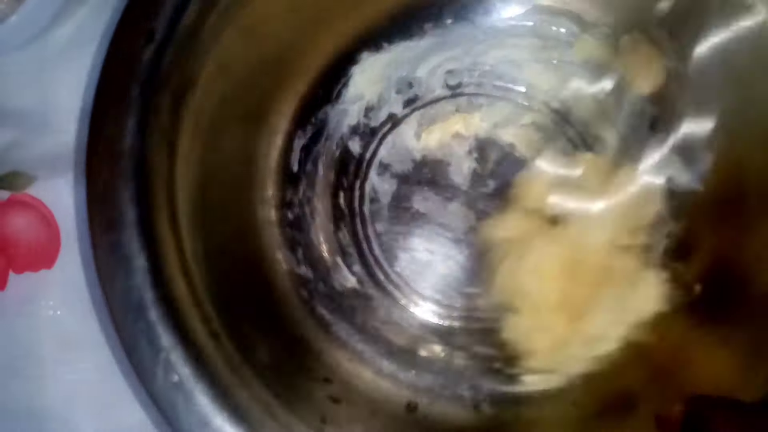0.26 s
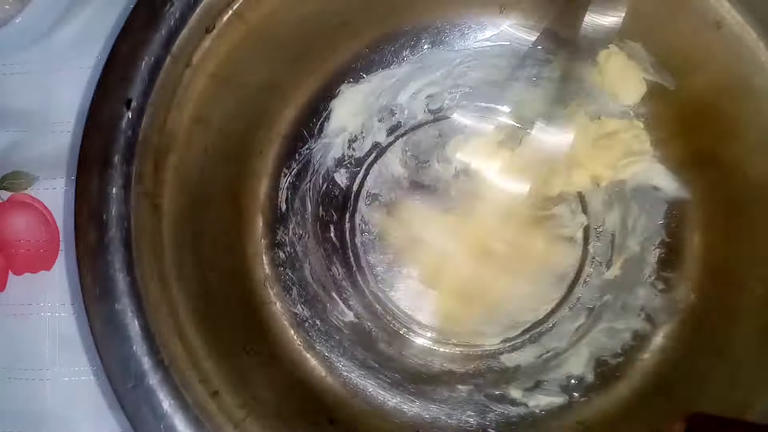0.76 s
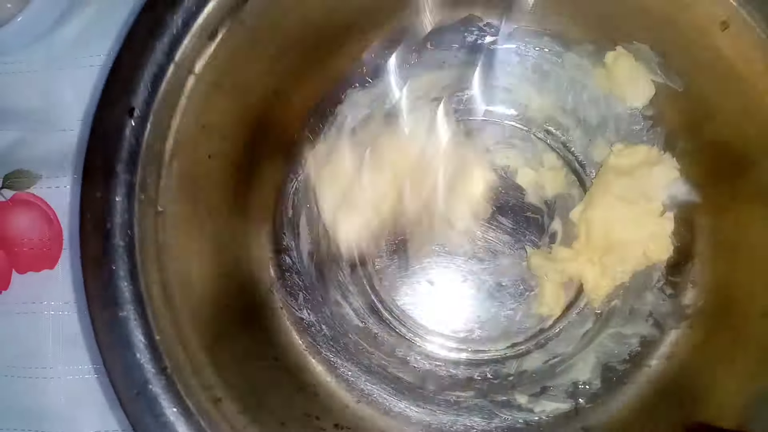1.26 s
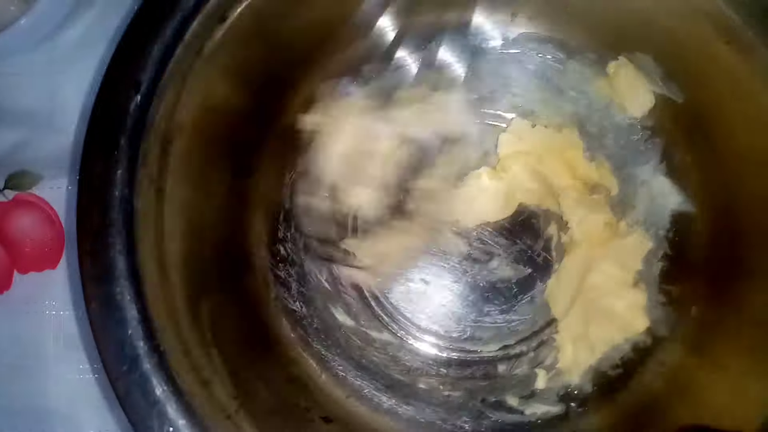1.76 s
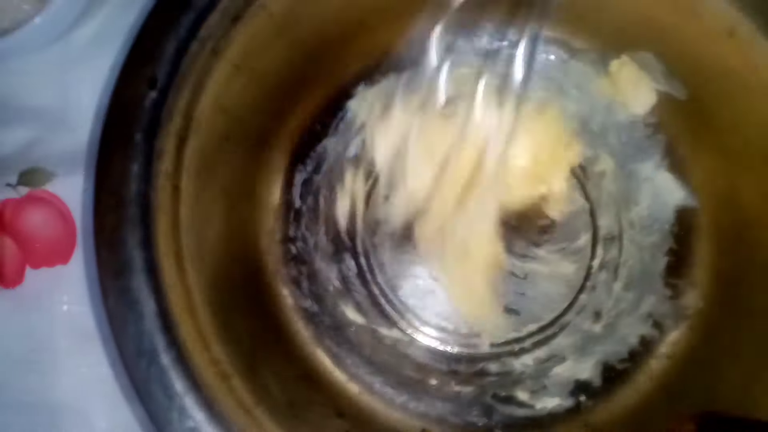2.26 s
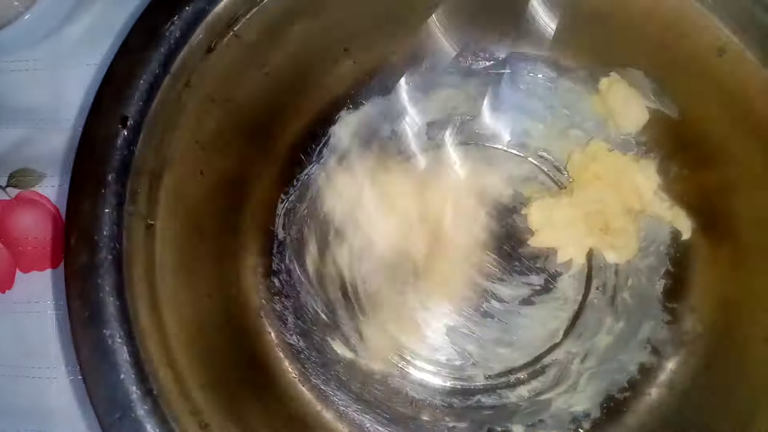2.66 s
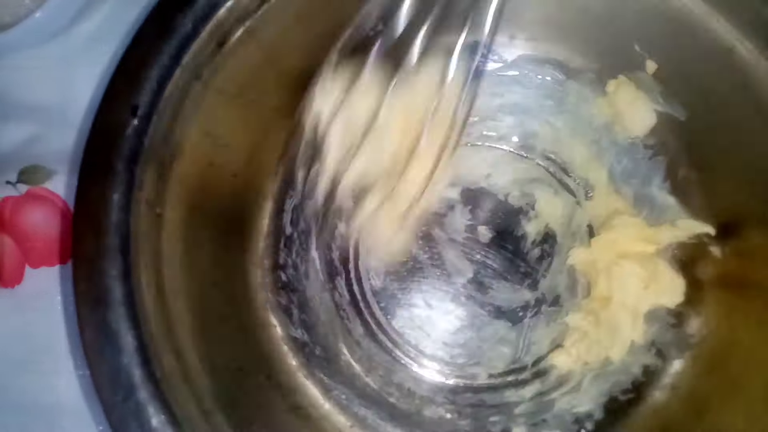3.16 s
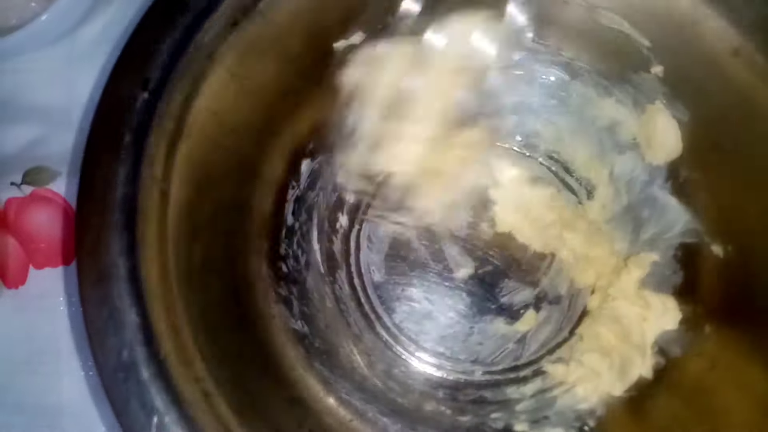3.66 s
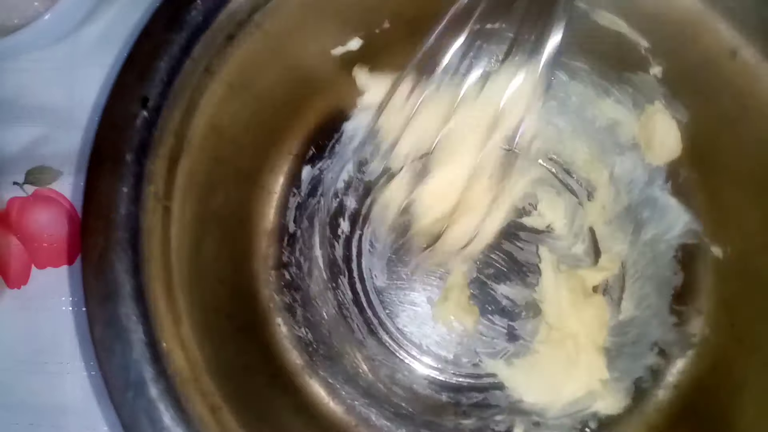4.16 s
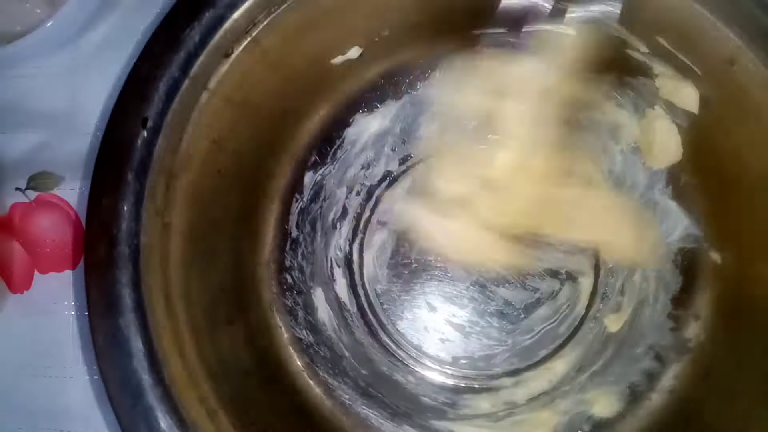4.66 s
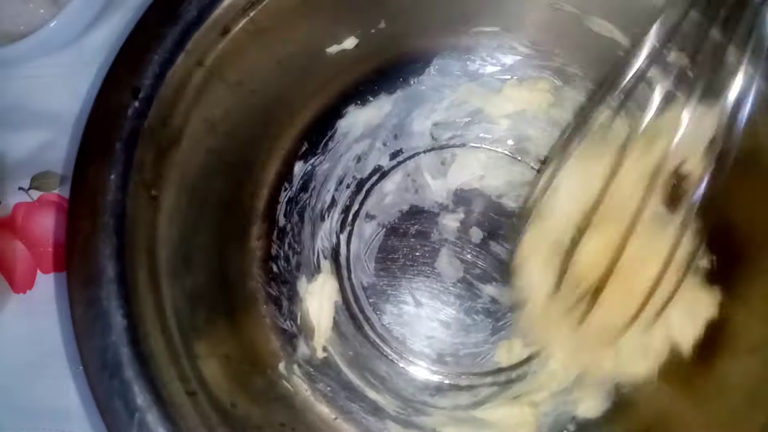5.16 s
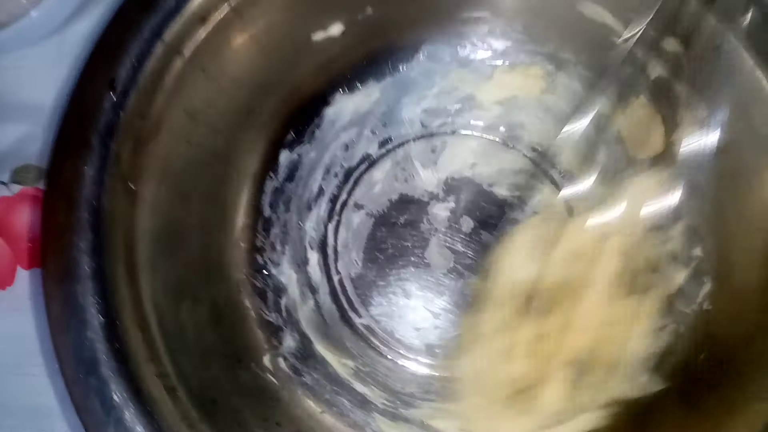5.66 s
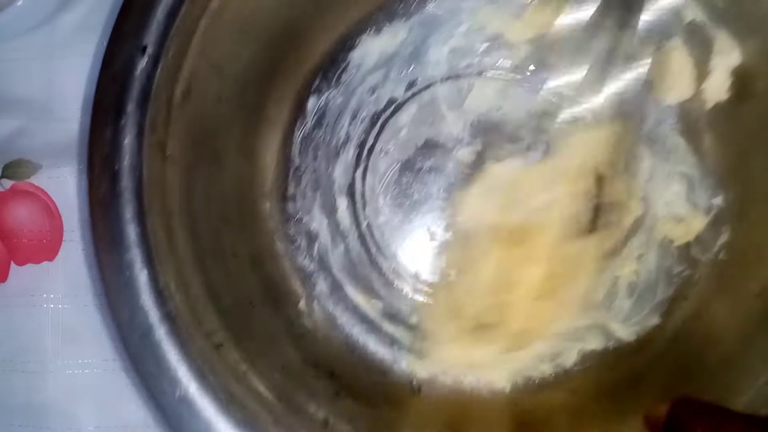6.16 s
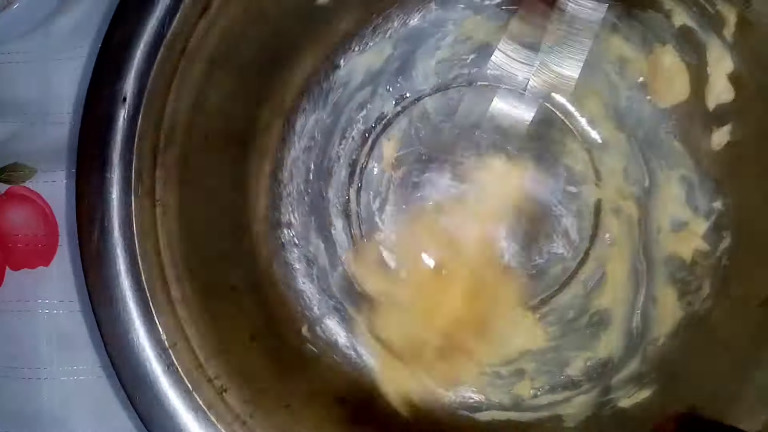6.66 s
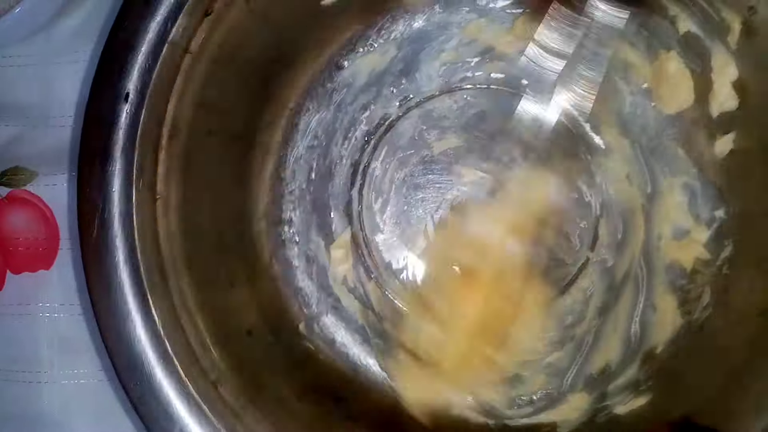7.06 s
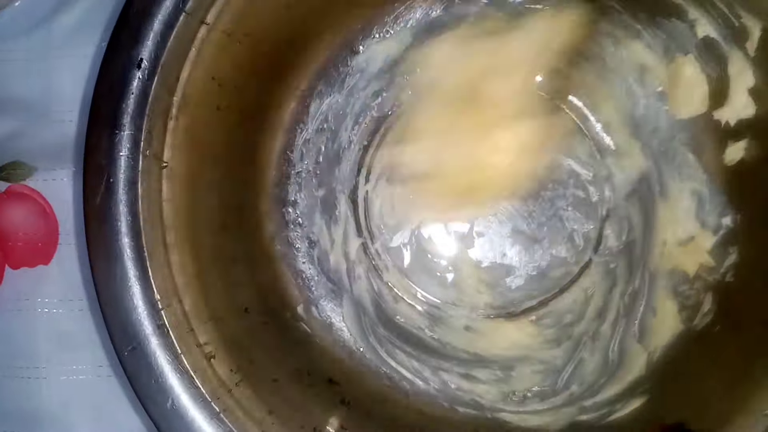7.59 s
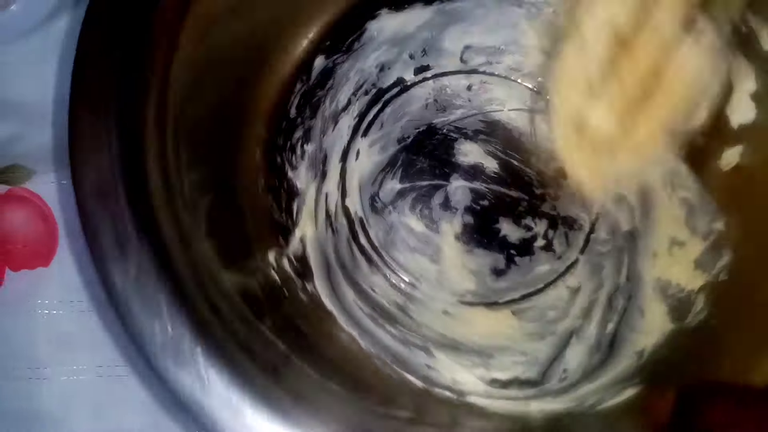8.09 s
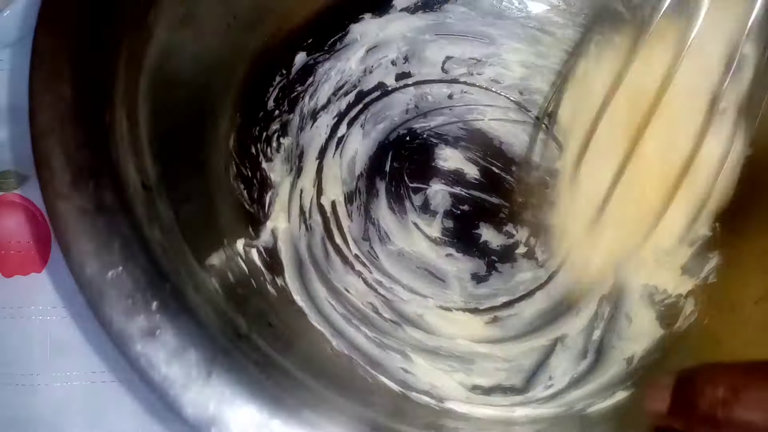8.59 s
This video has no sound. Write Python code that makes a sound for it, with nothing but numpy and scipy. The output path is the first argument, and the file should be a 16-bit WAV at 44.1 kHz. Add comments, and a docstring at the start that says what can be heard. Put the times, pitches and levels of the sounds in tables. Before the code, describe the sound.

Close, dry stereo sound of a wire whisk beating fat in a steel bowl, stronger on the left. From 0 s a scrape fades into a soft gap, then from 0.3 s quick strokes clatter, each a tenth of a second or so of gritty hiss with hard clicks and short, damped metal ring. Around 1.5 s the scraping softens and swells again at 1.75 s. Strokes continue unevenly, with thin wire tings near 2.95 and 4.35 s and small lulls near 3.4 s. Clacks cluster at 4.5 to 5.1 s; about 5.2 to 5.4 s is nearly quiet. A dull table bump lands at 5.6 s, another near 5.9 s. From 6 s the whisking is denser, with bright clinks and fuller scrapes from 7.7 s, still going at the cut near 8.8 s. Faint room noise, a wavering low hum and thin whistle lie underneath.

```python
"""Wires scrape, slip, click and strike on steel: a whisk circles in a bowl of fat, close under two ports.
Noise and blows drive the bowl's damped modes; clicks, singing modes and wire tings are added tones.
The bowl bumps the table as low damped sines. Behind it are a wavering sine hum, a thin whistle
and gliding bands of narrow noise, and a shaped-noise room floor that shows in the pauses."""
import sys
import numpy as np
from scipy import signal
from scipy.fft import rfft, irfft, next_fast_len
from scipy.io import wavfile
from scipy.ndimage import uniform_filter1d

SR = 44100
rng = np.random.default_rng(int(sys.argv[2]) if len(sys.argv) > 2 else 0)


def materialize(psi):
    """Save the field psi as 16-bit PCM at rate SR to the path in sys.argv[1].

    A 1-D psi becomes a single channel; in a 2-D psi each row is a channel.
    """
    bounded = np.clip(np.atleast_2d(psi).T, -1, 1)
    quanta = np.round(bounded * 32767).astype(np.int16)
    wavfile.write(sys.argv[1], SR, quanta)


N = 389403
T = np.arange(N) / SR
RIGHT_LAG_SAMPLES = 46


def gain_of(db):
    """Amplitude gain of a level in dB."""
    return 10 ** (np.asarray(db) / 20)


def evened(x):
    """Scales to rms 1 over the whole array."""
    return x / np.sqrt(np.mean(x ** 2) + 1e-20)


def read(points, hz):
    """Table value at hz, interpolated over log frequency."""
    table_hz, value = np.transpose(points)
    return np.interp(np.log(hz + 1), np.log(table_hz + 1), value)


def follow(rows):
    """Table columns as linear curves over time."""
    time_s, *columns = np.transpose(rows)
    return [np.interp(T, time_s, column) for column in columns]


def add(mix, start_s, sound):
    """Adds sound in place, cut at the end of the mix."""
    part = mix[..., round(start_s * SR):][..., :sound.shape[-1]]
    part += sound[..., :part.shape[-1]]


def wander(ms, count=1):
    """Smoothed noise of rms 1 that changes over about ms, in 16-sample steps."""
    size = max(int(ms * SR / 16000), 2)
    slow = rng.standard_normal((count, N // 16 + 1))
    slow = uniform_filter1d(uniform_filter1d(slow, size), size)
    return evened(np.repeat(slow, 16, axis=1)[:, :N])


def causal(db):
    """Minimum-phase spectrum for a gain in dB on rfft bins."""
    cepstrum = irfft(db * np.log(10) / 20)
    half = cepstrum.shape[-1] // 2
    cepstrum[..., 1:half] *= 2
    cepstrum[..., half + 1:] = 0
    return np.exp(rfft(cepstrum))


def resonate(x, hz, width_hz):
    """Shifts the curve hz down to zero, smooths, shifts back: a resonance of gain 1."""
    turn = np.exp(2j * np.pi * np.cumsum(hz) / SR)
    pole = np.exp(-np.pi * width_hz / SR)
    return 2 * (turn * signal.lfilter([1 - pole], [1, -pole], x / turn)).real


def narrow(hz, width_hz):
    """Noise of rms 1 squeezed by two resonances into a thin band around the curve hz."""
    noise = rng.standard_normal(len(hz))
    return evened(resonate(resonate(noise, hz, width_hz), hz, width_hz))


def ports(x, left_over_right_db):
    """One source at both ports: the right lags, and the levels differ."""
    side = gain_of(left_over_right_db / 2)
    return np.array([x * side, np.roll(x, RIGHT_LAG_SAMPLES) / side])


# air pocket between whisk and wall: columns time_s, resonance_hz [s, Hz]
AIR_POCKET = [(0.0, 1530), (0.32, 2440), (0.34, 1610), (0.59, 2430), (0.71, 1710), (0.91, 2400),
              (1.15, 1440), (1.4, 2700), (1.79, 1430), (1.89, 2100), (2.24, 1650), (2.43, 2050),
              (2.48, 1450), (2.63, 1960), (3.1, 1530), (3.25, 2170), (3.91, 1480), (3.98, 2100),
              (4.62, 1670), (4.78, 1240), (4.82, 2580), (4.92, 1480), (5.93, 1960), (6.05, 1510),
              (6.17, 2030), (7.62, 2250), (7.72, 1640), (7.8, 2430), (8.14, 1630), (8.21, 2300),
              (8.56, 1920), (8.66, 2440), (8.83, 2090)]
POCKET_RISE_HZ = 200  # over each sweep
WIRES_HZ = 6790
# slow tone change of the bowl: columns time_s, filter_share [s, multiplier; below 0 inverts the filter]
TONE_CHANGE = [(0, 0.17), (3.5, -0.2), (5.2, 0.82), (8.83, 0.44)]
# colour filter of that change at share 1: columns freq_hz, gain_db [Hz, dB]
TONE_FILTER = [(150, 10), (230, -2), (330, 1.5), (520, -8), (750, 2), (1000, -2.5), (1350, -5.5),
               (1600, -1.5), (2400, -2.5), (3200, -3), (4200, -1), (5400, -4), (6600, -2.5)]


def whisk():
    """Scraping and striking forces ring through the bowl by overlap-add convolution."""
    rings = bowl()
    count, size = rings.shape[1], rings.shape[-1]
    level_db, along = sweeps()
    force = (scrape(count, level_db) + strikes(count, level_db)).reshape(-1, N)

    blocks = np.pad(force, ((0, 0), (0, -N % size)))
    blocks = blocks.reshape(len(force), -1, size).astype(np.float32)
    force_spectrum = rfft(blocks, 2 * size)
    ring_spectrum = rfft(rings.reshape(-1, 2, size), 2 * size)
    rung = np.einsum("kbf,kpf->pbf", force_spectrum, ring_spectrum)

    hz = np.fft.rfftfreq(2 * size, 1 / SR)
    # a random treble delay per block makes the right port less like the left
    delay_s = .0015 * rng.random((rung.shape[1], 1)) * (1 - read(PORT_LIKENESS, hz))
    rung[1] *= np.exp(-2j * np.pi * hz * delay_s)
    # a random, smooth colour change per block varies the ring
    vary_db = 1.6 * evened(uniform_filter1d(rng.standard_normal(rung.shape[1:]), size=60))
    tone_db = follow(TONE_CHANGE)[0][::size, None] * read(TONE_FILTER, hz)
    rung = irfft(rung * causal(vary_db + tone_db)).reshape(2, -1, 2, size)

    head, tail = rung[:, :, 0].reshape(2, -1), rung[:, :, 1].reshape(2, -1)
    out = (head + np.pad(tail, ((0, 0), (size, 0)))[:, :head.shape[1]])[:, :N]
    out = out + 0.5 * resonate(out, WIRES_HZ + 0 * T, 670)
    pocket_hz = follow(AIR_POCKET)[0] + POCKET_RISE_HZ * along
    return out + 0.71 * resonate(out, pocket_hz, 297)


# wires sweeping along the steel: columns start_s, length_s, pressure_db, swell_db (start to end),
# boom_db, ring_db, sizzle_db (over pressure), fall_db_per_s (after the end) [s, s, dB x 5, dB/s]
WIRE_SWEEPS = [(0.001, 0.099, -31, -20.5, -14, -9.5, -10.5, 260),
               (0.07, 0.087, -38.5, 3.5, -38, -5, 2, 320), (0.201, 0.098, -53, 0, -24, -24, -4, 250),
               (0.296, 0.028, -41, 10, -26, -24, -1.5, 210), (0.356, 0.081, -29, 1, -23, -16, -5, 140),
               (0.453, 0.14, -28.5, -9.5, -16.5, -6.5, 1.5, 320),
               (0.621, 0.0081, -35, 23.5, -23, -5, 3.5, 324), (0.726, 0.17, -27, 5, -18.5, -7.5, -3.5, 300),
               (0.882, 0.16, -34, -9, -11.5, -9, 4.5, 150), (1.005, 0.045, -36, 8, -30, 1, 2, 240),
               (1.092, 0.037, -36, -8, -33, -16, 5, 370), (1.161, 0.16, -30, 1, -11, -0.5, -3.5, 250),
               (1.293, 0.1, -25.5, -6, -20.5, -11, -1, 260), (1.417, 0.038, -39, -16, -16, -9, -0.5, 300),
               (1.504, 0.26, -66, 15, -16, -27, -11, 244), (1.763, 0.079, -32, -2, -17, -5.5, -2.5, 260),
               (1.838, 0.16, -32.5, -2.5, -20, -13, -0.5, 261), (1.979, 0.05, -33.5, 0, -30, -15, 1.5, 430),
               (2.031, 0.12, -49.5, 6, -32, -23, -9, 340), (2.196, 0.034, -29.5, 1, -6.5, -11, -4.5, 250),
               (2.242, 0.11, -29.5, 11.5, -13.5, -11, -0.5, 280),
               (2.397, 0.037, -28.5, 6, -30, -8.5, -1.5, 310),
               (2.473, 0.074, -32.5, 4, -18.5, -13, -2.5, 280), (2.557, 0.1, -31.5, 6, -18, -6, -2, 320),
               (2.64, 0.083, -32.5, 5, -6.5, -22, -3.5, 280), (2.689, 0.18, -26, 8.5, -30, -11.5, -3, 383),
               (2.939, 0.042, -51, 14, -36, 0, 10, 338), (3.058, 0.16, -28.5, 6.5, -14.5, -7.5, -5, 250),
               (3.169, 0.044, -23, -0.5, -29, -7.5, -7, 140), (3.238, 0.067, -29, 1.5, -21, -30, 3, 496),
               (3.36, 0.19, -58, 11, -14, -22, -5, 319), (3.603, 0.16, -36, -5, -14, -7, -4.5, 277),
               (3.75, 0.14, -33, -8.5, -19.5, -12, 2.5, 500),
               (3.936, 0.093, -30, -4, -13.5, -12, -2.5, 270), (4.058, 0.14, -28, 5, -20.5, -12.5, 1, 228),
               (4.208, 0.13, -31, -6, -20, -8.5, -1, 320), (4.351, 0.091, -33, 13.5, -20, -10, -0.5, 270),
               (4.483, 0.086, -28.5, -6, -11.5, -11.5, -5, 260),
               (4.555, 0.16, -25.5, -4, -27.5, -13, -1.5, 100),
               (4.761, 0.056, -34, 18.5, -9.5, -10, 0.5, 245), (4.9, 0.16, -30.5, 2, -16.5, -13, -1.5, 240),
               (4.998, 0.098, -26.5, 0.5, -13, -9, -3, 247), (5.17, 0.37, -56, -9, -3.5, -0.5, -27, 280),
               (5.459, 0.22, -40, -11.5, -13, -9, -3.5, 240), (5.58, 0.082, -47, -2, 4, -23, 1.5, 140),
               (5.71, 0.3, -47, 0, -6, -2, -1, 250), (5.879, 0.03, -33.5, 6, -7, -9, -2.5, 130),
               (5.97, 0.34, -35.5, -7, -10.5, -7.5, -0.5, 100), (6.05, 0.069, -41.5, 5, -17, 9.5, -14, 250),
               (6.141, 0.041, -27.5, -1, -9, -6.5, -1.5, 200), (6.225, 0.037, -45.5, 3, 0, -5, 6, 98),
               (6.32, 0.18, -30, 4.5, -18, -13.5, 1.5, 360), (6.535, 0.094, -28, 11, -14, -33, -1, 180),
               (6.67, 0.16, -33, 3, -13, -18, -0.5, 290), (6.816, 0.11, -33, -16, -27, -11, 0.5, 280),
               (6.93, 0.15, -30, -5, -13.5, -15, 0.5, 240), (7.063, 0.088, -34.5, 19, -16, -22, 2.5, 240),
               (7.186, 0.11, -32.5, 0, -18, -14, 1.5, 230), (7.309, 0.074, -32, 7, -24, -32, 3.5, 320),
               (7.4, 0.082, -34, 3, -12.5, -12, -1, 320), (7.506, 0.049, -29.5, 4, -16, -18, 3.5, 130),
               (7.615, 0.057, -28.5, 5.5, -26, -14.5, -2, 102),
               (7.711, 0.084, -22.5, -0.5, -27, -15, -14.5, 220),
               (7.823, 0.13, -28.5, -7, -19.5, -13.5, -6.5, 280),
               (7.964, 0.14, -26.5, 2, -29, -10.5, -4, 300),
               (8.092, 0.2, -26, -0.5, -21.5, -15.5, -6.5, 120),
               (8.323, 0.093, -22, -7, -28, -19, -4.5, 218.7),
               (8.434, 0.037, -26, 4.5, -24.5, -9.5, -1, 96), (8.553, 0.12, -26, 7, -26, -13.5, -6.5, 191),
               (8.696, 0.18, -33, -4, -21, -12, -7.5, 250), (8.782, 0.039, -25.5, -1, -14, -21, -1, 253)]
ARCH_DB, RISE_DB_PER_S = 4.5, 559  # ends below middle; slope before the start
CLANK_DB = -5.5  # over pressure
RING_RISE_DB, SIZZLE_FALL_DB = 2.5, 1.5  # start to end of a sweep


def sweeps():
    """Scraping level in dB per register, and position within the sweep (-.5 to .5)."""
    t = T[::64]
    columns = np.transpose(WIRE_SWEEPS)[..., None]
    start_s, length_s, db, swell_db, boom_db, ring_db, sizzle_db, fall_db_per_s = columns
    along = np.clip((t - start_s) / length_s, 0, 1) - .5
    db = db + swell_db * along - ARCH_DB * (2 * along) ** 2
    db = db - RISE_DB_PER_S * np.maximum(start_s - t, 0)
    db = db - fall_db_per_s * np.maximum(t - start_s - length_s, 0)
    colour_db = [boom_db + 0 * along, ring_db + RING_RISE_DB * along,
                 CLANK_DB + 0 * along, sizzle_db - SIZZLE_FALL_DB * along]
    power = gain_of(2 * (db + np.array(colour_db))) + 1e-20
    phase = (power[2] * along).sum(0) / power[2].sum(0)  # weighted by clank
    level_db = np.array([np.interp(T, t, 10 * np.log10(p)) for p in power.sum(1)])
    return level_db, np.interp(T, t, phase)


def nearness(count, sharp):
    """Share of force per contact spot as the whisk circles at 2.3 Hz; squares sum to 1."""
    turns = 2.3 * T - np.arange(count)[:, None] / count
    share = np.exp(sharp * np.cos(2 * np.pi * turns))
    return share / np.sqrt((share ** 2).sum(0))


def scrape(count, level_db):
    """Force per register and spot: wires hiss separately, flicker as they slip, and tick."""
    wires = rng.standard_normal((count, N))
    where, size = rng.random((2, 3000))
    tick = 5.4 * gain_of(-4.5 * np.log(size + 0.099))
    wires.flat[(where * wires.size).astype(int)] += tick
    wires = wires * nearness(count, 0.64)
    slips = gain_of(0.77 * wander(2.05) + 2.23 * wander(21.6, count=4))
    level = gain_of(level_db + lifting())
    return (level * evened(slips))[:, None] * wires / np.sqrt((wires ** 2).sum(0).mean())


LIFT_DB = 6


def lifting():
    """Scraping gain in dB: it fades over 900 samples before each listed strike."""
    out, ramp = np.zeros(N), np.linspace(0, 1, 900) ** 3.0
    for start_s, *_ in WIRE_STRIKES:
        add(out, start_s - len(ramp) / SR, -LIFT_DB * ramp)
    return out


# wires striking the steel: columns start_s, blow_db, boom_db, ring_db, clank_db, sizzle_db
# [s, dB, then dB over the blow]
WIRE_STRIKES = [(0.303, -17, -17, -7, -13, -23), (0.3493, -21.5, -9, -6, -6, -19),
                (0.382, -8, -40, -19, -9, -20.5), (0.4574, -10, -36, -29, -13, -14),
                (0.4748, -8, -33, -22, -11, -19), (0.5, -8.5, -20, -17, -9, -17),
                (0.626, -10.5, -22, -10, -14, -9.5), (0.813, -8, -9.5, -12.5, -12, -18),
                (0.8428, -9.5, -22, -35, -8.5, -9), (0.8965, -11.5, -24, -19, -13, -10),
                (0.957, -16, -28, -25, -26, -1), (1.0038, -12, -46, -9.5, -10, -8),
                (1.099, -16, -40, -21, -28, -4.5), (1.1528, -12.5, -17, -6, -12, -17),
                (1.2058, -18.5, -24, -16, -7, -6), (1.2193, -5.5, -20, -13.5, -14, -11),
                (1.2944, -17, -35, -13, -19, -2), (1.3524, -12, -28, -23, -10, -10),
                (1.7476, -14, -4.5, -7, -10, -26), (1.755, -12.5, -12.5, -6, -8, -9.5),
                (1.9878, -16.5, -20, -10, -3, -21), (2.1765, -7, -28, -14, -14.5, -9.5),
                (2.3085, -15, -36, -27, -7.5, -26), (2.3367, -9, -27, -25, -10, -21),
                (2.4202, -17.5, -39, -22, -25, -9), (2.6864, -7, -19, -16, -11, -11),
                (2.7697, -11.5, -32, -17, -7, -22), (2.8308, -11.5, -34, -23, -9, -8),
                (2.9446, -12.5, -47.5, -26, -38, -8), (3.046, -6.5, -26, -11, -10.5, -15),
                (3.0818, -7.5, -14, -13, -8.5, -29), (3.1727, -18, -30, -14, -7, -23),
                (3.594, -18.5, -9, -8.5, -11, -20), (3.601, -8.5, -22.5, -10, -14, -24),
                (3.7613, -16, -28, -8.5, -8.5, -20), (3.919, -15.5, -17, -2.5, -7, -7.5),
                (3.9468, -12, -37, -33, -12.5, -2.5), (4.199, -11.5, -19, -14, -6, -21),
                (4.231, -11, -38, -25, -7, -20), (4.35, -10, -32, -24, -28, -10),
                (4.476, -11.5, -15.5, -16, -13.5, -7.5), (4.547, -14, -36, -29, -11, -8.5),
                (4.6175, -5, -26, -26, -19.5, -25), (4.762, -7, -46, -26, -14, -12),
                (4.803, -7, -23, -34, -23, -9), (4.817, -10, -32, -18, -8, -15),
                (4.8872, -6.5, -19, -24, -18, -43), (4.908, -10, -33, -3.5, -10, -29),
                (5.031, -11.5, -32, -17, -7, -9), (5.058, -9, -36, -17, -7, -11),
                (5.455, -6, -29, -18, -10, -13.5), (5.882, -17.5, -5, -29, -9.5, -12.5),
                (6.0402, -6.5, -35, 2, -16, -9), (6.0704, -15, -16, -6, -30, -6),
                (6.135, -16, -32, -10, -25, -4), (6.1524, -4.5, -23, -32, -17, -10),
                (6.1648, -7.5, -32, -19, -9.5, -14), (6.3287, -12, -17, -27, -13, -11.5),
                (6.4384, -9.5, -37, -24, -9, -7), (6.5374, -8, -42, -26, -14.5, -4),
                (6.58, -14.5, -33, -30, -12, -5), (6.6012, -13.5, -33, -16, -12, -3),
                (6.6107, -11.5, -13, -15, -12, -9), (6.76, -7, -24, -25, -10, -14),
                (6.805, -13, -24, -20, -15, -21), (6.829, -16.5, -33, -26, -7.5, -17),
                (6.839, -12, -40, -19.5, -22, -10), (6.9836, -7.5, -23, -14.5, -12, -9),
                (6.997, -8, -20, -17, -8.5, -18), (7.093, -16, -12, -20, -16, -6),
                (7.1413, -11.5, -42, -37, -8, -11), (7.15, -16, -39, -30, -9, -12),
                (7.194, -14, -33, -18, -14, -24), (7.2389, -9.5, -35, -19.5, -13, -14.5),
                (7.3673, -7.5, -16, -22, -9, -12), (7.377, -9.5, -27, -14, -8.5, -21),
                (7.502, -15, -25, -25, -23, -3), (7.517, -13.5, -23, -26, -27, -3),
                (7.532, -11, -44, -18, -10, -10), (7.6238, -12.5, -42, -19, -12, -9),
                (7.7345, -3.5, -43, -31, -13.5, -12.5), (7.7736, -7, -25, -44, -14, -13),
                (7.8206, -14, -15, -7, -10, -31), (7.9608, -6, -23.5, -24, -9.5, -13),
                (8.0114, -6, -42, -20, -8.5, -12), (8.092, -12.5, -37, -27, -13, -6.5),
                (8.2116, -12.5, -12.5, -10, -7, -28), (8.316, -8, -22, -13, -14, -11.5),
                (8.4436, -15, -24, -17, -14, -22), (8.4598, -12.5, -37, -32, -4, -15),
                (8.594, -11, -38, -31, -8, -22), (8.6363, -11.5, -18, -10.5, -13, -23),
                (8.7774, -17, -23, -8, -23, -19), (8.8005, -12, -31, -23, -10, -14)]
TICK_DB, CLATTER_T60_S = 12.5, 0.019  # tick over initial clatter; decay
TAPS_PER_S, TAP_DB, TAP_SPREAD_DB = 9, -3, 2  # level over the scraping


def strikes(count, level_db):
    """Wires land together: a one-sample tick and decaying noise; lesser taps come at random."""
    force, t = np.zeros((4, N)), np.arange(2500) / SR

    def blow():
        """Clatter plus tick."""
        clatter = rng.standard_normal(len(t)) * gain_of(-60 * t / CLATTER_T60_S)
        return clatter + gain_of(TICK_DB) * (t == 0)

    for start_s, blow_db, *register_db in WIRE_STRIKES:
        add(force, start_s, gain_of(blow_db + np.array(register_db))[:, None] * blow())
    for start_s in rng.random(round(TAPS_PER_S * N / SR)) * T[-1]:
        db = level_db[:, round(start_s * SR)] + TAP_DB + TAP_SPREAD_DB * rng.standard_normal(4)
        add(force, start_s, gain_of(db)[:, None] * blow())
    return force[:, None] * nearness(count, 2.13)


# clear bowl modes: columns mode_hz, level_db (on the dense modes' scale), t60_s [Hz, dB, s]
CLEAR_MODES = [(233, 9, 0.1), (371.5, 9, 0.06), (420, 10.5, 0.06), (496.5, 9.5, 0.071), (541.6, 9.5, 0.078),
               (571, 3.5, 0.44), (742, 9.5, 0.13), (802, 10, 0.054), (839.4, 7, 0.074), (992, 6, 0.22),
               (1014, 0, 0.23), (1127, -0.5, 0.075), (1270, 4.5, 0.21), (1120, 6.5, 0.037),
               (1146, 8, 0.0037), (1377, 13, 0.087), (1534, 13.5, 0.11), (1700, 8.5, 0.26),
               (1950, -33, 0.18), (2290, 17, 0.072), (2540, -5, 0.054), (3107, 8.5, 0.27),
               (4000, -20, 0.027), (4060, -23, 0.097), (6650, -13, 0.023), (5800, -23, 0.045)]
# dense mode decay: columns freq_hz, t60_s [Hz, s]
DENSE_DECAY = [(200, 0.1), (1000, 0.066), (3000, 0.061), (7000, 0.022), (15000, 0.18)]
# dense mode level: columns freq_hz, level_db [Hz, dB]
DENSE_LEVEL = [(300, 0), (650, -3.5), (1100, -3.5), (1800, 7)]
# centres of boom, ring, clank, sizzle: column centre_hz [Hz]
REGISTER_CENTRES = [420, 850, 1700, 5000]
# tone colour at both ports: columns freq_hz, gain_db [Hz, dB]
PORT_COLOUR = [(30, -73), (60, -38), (100, -8), (150, -14), (230, -7.5), (310, -14), (390, -8), (540, -8.5),
               (660, -11), (1000, -7.5), (1500, -2), (2200, -2.5), (2800, -1.5), (3300, -6), (3800, -4.5),
               (4300, -3), (5000, -2.5), (5700, -1.5), (6800, 0.5), (8300, -6), (11000, -27), (13700, -31),
               (14700, -23.5)]
# port balance: columns freq_hz, left_over_right_db [Hz, dB]
PORT_BALANCE = [(60, 10), (250, 3.5), (500, 8), (1000, 11.5), (2500, 9.5), (4500, 6.5), (6500, 10.5),
                (8500, -2), (12000, -6), (15000, -11)]
# port likeness: columns freq_hz, likeness [Hz, 0-1]
PORT_LIKENESS = [(100, 0.76), (550, 1), (800, 0.37), (1400, 0.79), (2000, 0.014), (4000, 0.068)]


def bowl(count=4, size=8192):
    """Damped steel modes as impulse responses: (register, contact spot, port, sample)."""
    dense_hz = np.linspace(110, 16000, 480) + rng.uniform(-14, 14, 480)
    clear_hz, clear_db, clear_t60_s = np.transpose(CLEAR_MODES)
    hz = np.r_[dense_hz, clear_hz]
    t60_s = np.r_[read(DENSE_DECAY, dense_hz), clear_t60_s]
    mode_db = np.r_[read(DENSE_LEVEL, dense_hz), clear_db]
    height = gain_of(mode_db) / np.sqrt(t60_s)  # equal energy at any decay
    t = np.arange(size) / SR
    rings = np.exp(np.outer(2j * np.pi * hz - np.log(1000) / t60_s, t).astype(np.complex64))

    # each spot drives each mode in its own phase and strength
    left, other = np.exp(2j * np.pi * rng.random((2, count, len(hz))))
    reach = gain_of(2.2 * rng.standard_normal(left.shape))
    same = read(PORT_LIKENESS, hz)
    right = same * left + np.sqrt(1 - same ** 2) * other
    right = right * np.exp(-2j * np.pi * hz * RIGHT_LAG_SAMPLES / SR)

    share = np.array([read(list(zip(REGISTER_CENTRES, one)), hz) for one in np.eye(4)]) ** 2
    register = share / np.linalg.norm(share, axis=0)  # neighbours overlap
    weights = register[:, None, None] * np.stack([left * reach, right * reach], 1) * height
    # above the boom the contact itself is heard first
    front = 1 + np.outer([0, 1.1, 1.4, 1.6], np.exp(-t / 0.00058))
    onset = np.minimum(t / 0.00041, 1) * front
    out = (weights.astype(np.complex64) @ rings).real * onset[:, None, None]

    bin_hz = np.fft.rfftfreq(2 * size, 1 / SR)
    mic = causal(read(PORT_COLOUR, bin_hz) + np.outer([.5, -.5], read(PORT_BALANCE, bin_hz)))
    out = irfft(rfft(out, 2 * size) * mic)[..., :size]
    energy = (out.mean(2) ** 2).sum(-1)  # of the port mean
    return out / np.sqrt(energy)[:, :, None, None]


EDGE_T60_S = .003


def click(level_db, pitch_hz, edge_db, t60_s):
    """Three decaying sines, led by an edge of differenced noise."""
    t = np.arange(400) / SR
    apart, turn = rng.uniform([1.15, .6], [1.45, .85]), rng.random(2)
    side_tones = np.sin(2 * np.pi * (np.outer(t * pitch_hz, apart) + turn)).sum(1)
    partials = np.sin(2 * np.pi * pitch_hz * t) + .45 * side_tones
    body = partials * gain_of(level_db - 60 * t / t60_s) * np.minimum(t / 0.00044, 1)
    edge_noise = np.diff(rng.standard_normal(len(t) + 3), n=3) / 4
    edge = edge_noise * gain_of(level_db + edge_db - 60 * t / EDGE_T60_S)
    out = np.zeros((2, len(t)))
    for x, db in zip((body, edge), read(PORT_BALANCE, np.array([pitch_hz, 11000]))):
        out += ports(x, db) * 2 / gain_of(abs(db) / 2)  # louder port at 2x, halved in the port mean
    return out


# single wires clicking on steel: columns start_s, level_db, pitch_hz, edge_db (over level)
# [s, dB, Hz, dB]
WIRE_CLICKS = [(0.3016, -22, 2600, -33), (0.3501, -28, 2920, -26), (0.3815, -10, 2200, -36),
               (0.6255, -20, 2700, -31), (0.7143, -27, 3040, -30), (0.7213, -33, 6700, -28),
               (0.815, -16, 2270, -34), (0.8977, -12, 2620, -30), (0.9585, -18, 7700, -29),
               (1.0046, -20, 4650, -31), (1.102, -24, 5880, -26), (1.1003, -31, 6210, -27),
               (1.154, -18, 2960, -29), (1.18, -20, 2950, -25), (1.2203, -11, 4650, -25),
               (1.2932, -15, 2520, -31), (1.697, -39, 2000, -32), (1.718, -34, 2860, -10),
               (1.7534, -16.5, 3080, -33), (1.7833, -18, 2180, -30), (2.088, -24, 4600, -42),
               (2.125, -39, 2100, -35), (2.1775, -16, 2310, -35), (2.3366, -11.5, 2970, -28),
               (2.419, -22, 7000, -31), (2.6857, -14.5, 2970, -29), (2.831, -16, 6300, -28),
               (2.9453, -12.5, 6070, -37), (3.0462, -21, 2140, -31), (3.0814, -17, 2680, -34),
               (3.1737, -16, 3020, -32), (3.593, -37, 6260, -42), (3.593, -22, 2590, -38),
               (3.5997, -19, 2000, -30), (3.7524, -17, 3060, -30), (3.853, -23, 6800, -23),
               (3.9195, -30, 2260, -23), (3.9472, -17, 6300, -31), (4.0696, -28, 6540, -22),
               (4.2318, -22, 6400, -27), (4.349, -14.5, 5540, -32), (4.3944, -22, 2950, -26),
               (4.4767, -20, 6420, -32), (4.5132, -14, 2240, -32), (4.5436, -18, 4240, -26),
               (4.617, -15, 2670, -30), (4.7656, -8, 6060, -32), (4.802, -12, 6500, -30),
               (4.8, -12.5, 5850, -34), (4.8888, -20, 2590, -43), (4.9106, -16, 2630, -37),
               (5.0588, -14, 2640, -29), (5.3, -42, 2020, -36), (5.457, -14, 2550, -35),
               (5.7075, -30, 2000, -32), (5.8825, -29, 5530, -26), (5.883, -20, 2230, -33),
               (5.9125, -18, 2540, -32), (5.9988, -19, 2040, -26), (6.0417, -9.5, 6050, -25),
               (6.0696, -19, 4050, -32), (6.138, -18, 4170, -28), (6.3285, -27, 2000, -29),
               (6.3283, -28, 2240, -30), (6.368, -20, 6170, -30), (6.439, -29, 6700, -31),
               (6.537, -20, 6400, -32), (6.5804, -22, 6700, -27), (6.6118, -11.5, 2090, -30),
               (6.76, -13, 2020, -34), (6.8053, -17, 2610, -31), (6.8412, -13.5, 6590, -28),
               (6.9295, -15, 6430, -28), (6.9837, -14, 2120, -30), (7.0918, -18, 2470, -27),
               (7.1412, -17, 2050, -26), (7.195, -14, 2840, -33), (7.2376, -13.5, 2860, -32),
               (7.3657, -16, 2200, -30), (7.5022, -22, 6600, -29), (7.5323, -10.5, 2900, -32),
               (7.6238, -10.5, 2260, -32), (7.7365, -16, 2070, -33), (7.7742, -5.5, 2500, -37),
               (7.822, -17, 2260, -34), (7.859, -14, 2190, -32), (7.9613, -23, 2060, -28),
               (8.0097, -21, 2690, -31), (8.096, -17, 6540, -31), (8.213, -18, 2670, -32),
               (8.3165, -17, 2430, -28), (8.4414, -17, 2130, -29), (8.595, -14, 2250, -32),
               (8.6388, -12, 2480, -35), (8.7782, -15, 2580, -33)]
# pitches around which grit falls: column pitch_hz [Hz]
GRIT_PITCHES = [1600, 2700, 4300, 6490, 6720]
CLICK_T60_S, GRIT_T60_S = .01, .006
GRIT_PER_S, GRIT_DB, GRIT_SPREAD_DB, GRIT_EDGE_DB = 320, 6, 2.6, -20


def clicks():
    """Listed wire clicks, and random grit whose level follows the scraping sizzle."""
    out, sizzle_db = np.zeros((2, N)), sweeps()[0][3]
    for start_s, *row in WIRE_CLICKS:
        add(out, start_s, click(*row, CLICK_T60_S))
    for when, pitch, bend, size in rng.random((round(GRIT_PER_S * N / SR), 4)):
        db = sizzle_db[int(when * N)] + GRIT_DB - GRIT_SPREAD_DB * np.log(size + 0.054)
        pitch_hz = GRIT_PITCHES[int(pitch * len(GRIT_PITCHES))] * (0.887 + 0.25 * bend)
        add(out, when * T[-1], click(db, pitch_hz, GRIT_EDGE_DB, GRIT_T60_S))
    return out


def heard(x, hz):
    """One pitch at both ports, with level x in their mean."""
    db = read(PORT_BALANCE, hz)
    lag_turn = np.exp(2j * np.pi * hz * RIGHT_LAG_SAMPLES / SR)
    mean = abs(gain_of(db / 2) + lag_turn / gain_of(db / 2)) / 2
    return ports(np.pad(x, (0, RIGHT_LAG_SAMPLES)), db) / mean


# bowl modes singing under a wire: columns start_s, length_s, pitch_hz, level_db [s, s, Hz, dB]
SINGING_MODES = [(0.0, 0.09, 740, -52), (0.0, 0.13, 1359, -43), (0.292, 0.15, 500, -45.5),
                 (0.313, 0.071, 223, -48), (0.352, 0.08, 1444, -34.5), (0.347, 0.09, 1006, -36.5),
                 (0.483, 0.072, 233, -40), (0.49, 0.086, 526, -38.5), (0.622, 0.061, 525, -40),
                 (0.512, 0.11, 2140, -38.5), (0.516, 0.04, 954, -29.5), (0.63, 0.071, 405, -46),
                 (0.816, 0.063, 811, -33.5), (0.966, 0.15, 742, -40.5), (1.215, 0.059, 493, -35),
                 (1.167, 0.18, 744, -39), (1.228, 0.05, 1390, -35), (1.264, 0.14, 233, -47),
                 (1.324, 0.048, 997, -30.5), (1.764, 0.075, 848, -36), (2.175, 0.05, 525.3, -38.5),
                 (2.176, 0.059, 1402, -33), (2.343, 0.069, 970, -31), (2.348, 0.11, 562, -39.5),
                 (2.353, 0.085, 230, -41.5), (2.554, 0.11, 740, -47), (2.661, 0.19, 555.5, -40),
                 (2.687, 0.1, 801, -38), (2.696, 0.18, 235.5, -42.5), (2.816, 0.096, 1017, -34),
                 (3.165, 0.091, 571, -44), (3.241, 0.13, 1015, -37), (3.58, 0.083, 490, -46),
                 (3.59, 0.025, 1740, -31), (3.593, 0.035, 1446, -38), (4.085, 0.057, 1404, -36),
                 (4.258, 0.11, 1413, -41), (4.55, 0.1, 1660, -34), (4.634, 0.03, 1405, -30),
                 (4.62, 0.061, 2981, -35), (4.709, 0.028, 1600, -30), (4.777, 0.2, 1250, -45),
                 (4.915, 0.052, 412, -36), (4.93, 0.043, 742, -42), (5.104, 0.063, 1692, -47),
                 (6.054, 0.13, 740, -37), (6.399, 0.18, 730, -50), (6.588, 0.11, 797, -41),
                 (6.602, 0.061, 880, -39), (7.691, 0.046, 1255, -35), (7.772, 0.042, 1555, -32),
                 (7.957, 0.052, 741, -39), (7.817, 0.096, 981, -41), (7.825, 0.052, 1510, -39.0),
                 (7.866, 0.099, 1605, -42), (8.127, 0.025, 1600, -28), (8.21, 0.071, 750, -36),
                 (8.308, 0.029, 760, -38), (8.635, 0.069, 747, -37), (8.669, 0.13, 210, -47.5)]
SING_RISE_SHARE, SING_FALL_DB, SING_WIDTH_HZ = 0.13, 11, 21  # share of length; loss at length_s


def singing():
    """Friction feeds one mode: sine plus narrow noise swells, wavers and dies away."""
    out = np.zeros((2, N))
    for start_s, length_s, hz, db in SINGING_MODES:
        u = np.arange(round(1.8 * length_s * SR)) / (length_s * SR)  # runs past the length to 1.8
        rise = np.sin(np.pi / 2 * np.minimum(u / SING_RISE_SHARE, 1))
        shape = rise * gain_of(db - SING_FALL_DB * u ** 3)
        tone = np.sqrt(2) * np.sin(2 * np.pi * (hz * u * length_s + rng.random()))
        voice = evened(tone + 0.67 * narrow(hz + 0 * u, SING_WIDTH_HZ))
        add(out, start_s, heard(shape * voice, hz))
    return out


# wires ringing: columns start_s, pitch_hz, level_db, t60_s [s, Hz, dB, s]
WIRE_TINGS = [(2.1263, 7300, -28, 0.009), (2.946, 6300, -24, 0.1), (2.95, 6900, -28, 0.09),
              (4.348, 5750, -24, 0.04), (4.352, 4200, -27, 0.06), (4.354, 6400, -27, 0.1),
              (4.36, 3790, -33, 0.2), (4.477, 6500, -26, 0.05)]


def tings():
    """A thin wire rings on one blurred pitch: decaying sine plus narrow noise."""
    out, t = np.zeros((2, N)), np.arange(6000) / SR
    for start_s, hz, db, t60_s in WIRE_TINGS:
        tone = 0.4 * np.sin(2 * np.pi * hz * t) + narrow(hz + 0 * t, 300)
        shape = gain_of(db - 60 * t / t60_s) * np.minimum(t / 0.00062, 1)
        add(out, start_s, heard(shape * tone, hz))
    return out


# bowl bumping the table: columns start_s, level_db, pitch_hz, t60_s [s, dB, Hz, s]
TABLE_BUMPS = [(4.768, -34.5, 114.6, 0.099), (5.603, -13.5, 159, 0.05), (5.64, -37, 119, 0.32),
               (5.891, -20.5, 120, 0.079), (6.033, -35, 96.9, 0.065), (7.376, -39, 177, 0.067),
               (8.678, -34, 135, 0.31)]


def bumps():
    """Dull thuds: bowl and table swing as two low, quickly damped sines."""
    out, t = np.zeros(N), np.arange(6000) / SR
    for start_s, db, hz, t60_s in TABLE_BUMPS:
        swing = np.sin(2 * np.pi * hz * t) + 0.54 * np.sin(2 * np.pi * hz * 0.81 * t)
        add(out, start_s, gain_of(db - 60 * t / t60_s) * swing * np.minimum(t / 0.0067, 1))
    return ports(out, 7.5)


# narrow gliding tones, a wire ringing on after a strike and faint squeaks and swishes:
# columns start_s, length_s, start_hz, end_hz, width_hz, level_db [s, s, Hz, Hz, Hz, dB]
GLIDING_TONES = [(1.67, .07, 1200, 2000, 150, -56), (2.955, .07, 3330, 3180, 110, -41),
                 (3.01, .035, 2950, 2940, 90, -52), (3.37, .15, 5790, 5760, 130, -57),
                 (3.40, .09, 3900, 3400, 900, -56), (5.33, .1, 5720, 5690, 130, -56),
                 (5.37, .07, 5300, 3200, 900, -54)]


def glides():
    """Short bands of noise gliding in pitch."""
    out = np.zeros(N)
    for start_s, length_s, start_hz, end_hz, width_hz, db in GLIDING_TONES:
        glide_hz = np.linspace(start_hz, end_hz, round(length_s * SR))
        shape = gain_of(db) * signal.windows.tukey(len(glide_hz), .6)
        add(out, start_s, shape * narrow(glide_hz, width_hz))
    return ports(out, 12.0)


# hum level: columns time_s, level_db [s, dB]
HUM_LEVEL = [(0.0, -56), (0.34, -83), (0.52, -64), (0.93, -74), (0.98, -60), (1.99, -106), (2.24, -66),
             (2.53, -82), (2.61, -54), (2.97, -89), (3.32, -53), (3.56, -74), (3.79, -48), (4.28, -64),
             (4.33, -61), (4.48, -52), (4.84, -73), (4.94, -45), (5.43, -45), (5.68, -56), (5.75, -42.5),
             (6.03, -49), (6.08, -61), (6.24, -42), (6.34, -41), (6.42, -51), (7.08, -58), (7.33, -41.5),
             (8.73, -41), (8.83, -42)]
HUM_HZ, HUM_WAVER_HZ, HUM_WAVER_DB = 70, 1.32, 1.5  # wavers are rms


def hum():
    """Low sine wavering in pitch and level."""
    hz = HUM_HZ + HUM_WAVER_HZ * wander(55)[0]
    db = follow(HUM_LEVEL)[0] + HUM_WAVER_DB * wander(40)[0]
    tone = np.sqrt(2) * np.sin(2 * np.pi * np.cumsum(hz) / SR)
    return ports(gain_of(db) * tone, 6.0)


# thin whistle: columns time_s, pitch_hz, level_db [s, Hz, dB]
THIN_WHISTLE = [(0, 2060, -62), (1.6, 2070, -58), (3.5, 2030, -54), (5.3, 1930, -50), (5.8, 1930, -51),
                (8.83, 1950, -50)]
WHISTLE_WAVER_HZ = 24  # rms


def whistle():
    """Narrow noise around a wavering pitch."""
    hz, db = follow(THIN_WHISTLE)
    thin = narrow(hz + WHISTLE_WAVER_HZ * wander(14)[0], 170)
    return ports(gain_of(db) * thin, 12.0)


# room floor spectrum: columns freq_hz, density_db [Hz, relative dB per Hz]
FLOOR_SHAPE = [(18, -31), (30, 2), (87, 4.5), (139, 8.5), (265, 6.5), (320, -3), (380, -17), (500, -28),
               (750, 1), (1140, -10), (2000, 2), (2600, -3), (5900, -3), (8000, -1), (10000, -55),
               (15000, -69)]
FLOOR_DB = -56.5


def floor():
    """Shaped room noise, more alike at the ports in the bass than in the treble."""
    size = next_fast_len(N)
    hz = np.fft.rfftfreq(size, 1 / SR)
    left, other = rfft(rng.standard_normal((2, size)))
    same = read(PORT_LIKENESS, hz)
    pair = np.array([left, same * left + np.sqrt(1 - same ** 2) * other])
    pair = pair * gain_of(read(FLOOR_SHAPE, hz) + np.outer([.5, -.5], read(PORT_BALANCE, hz)))
    return gain_of(FLOOR_DB + 1.0 * wander(56)) * evened(irfft(pair, size)[:, :N])


def scene():
    """All sources summed at the two ports."""
    close = whisk() + clicks() + singing() + tings() + bumps()
    return close + glides() + hum() + whistle() + floor()


EDGE_HZ = 15550


def record(dry):
    """Clips peaks at 0.92, then low-passes at the band edge."""
    edge = signal.firwin(511, EDGE_HZ, window=("kaiser", 9), fs=SR)
    return signal.oaconvolve(np.clip(dry, -.92, .92), edge[None], "same")


dry = scene()
out = record(dry)
materialize(out)
```